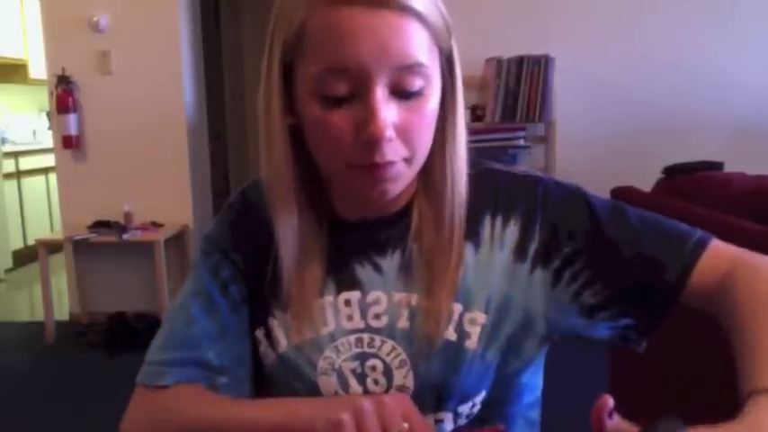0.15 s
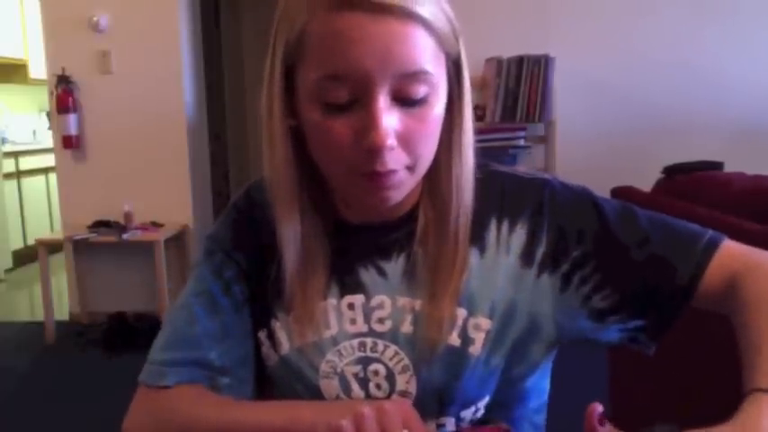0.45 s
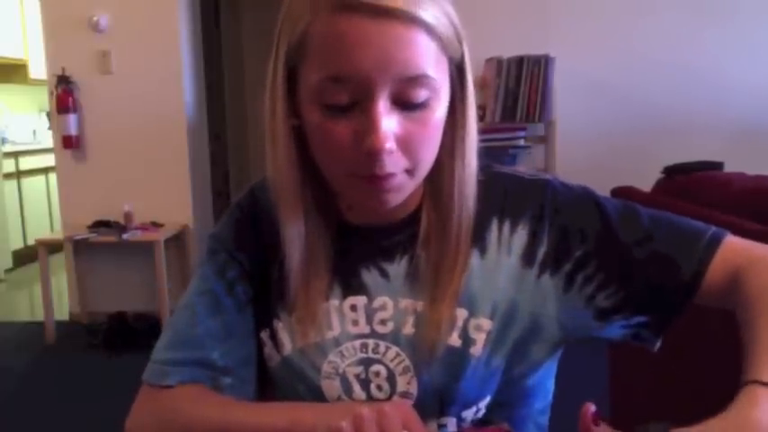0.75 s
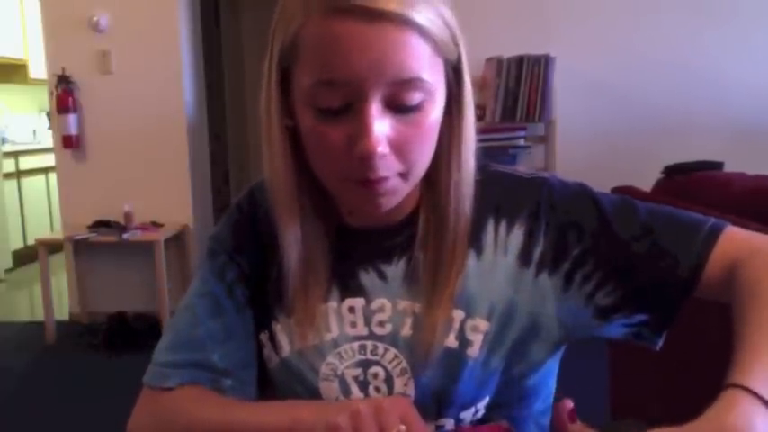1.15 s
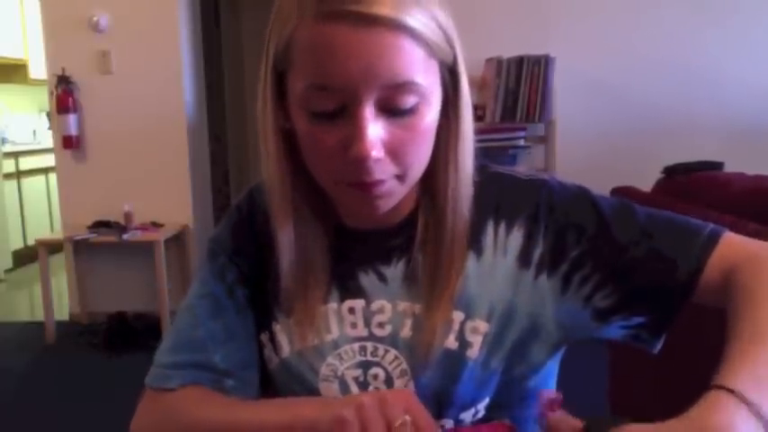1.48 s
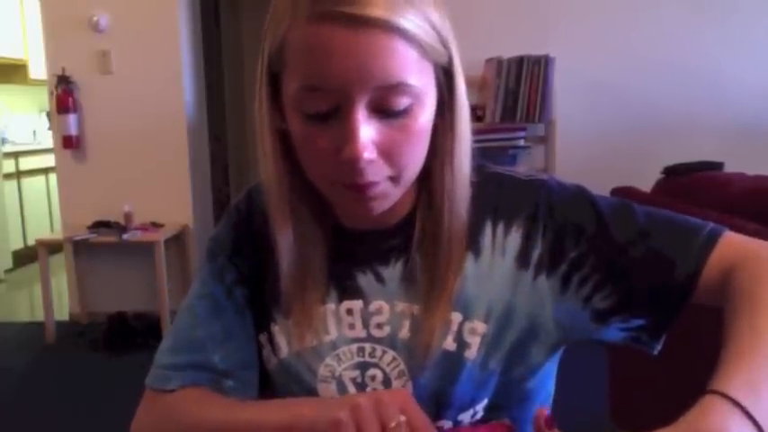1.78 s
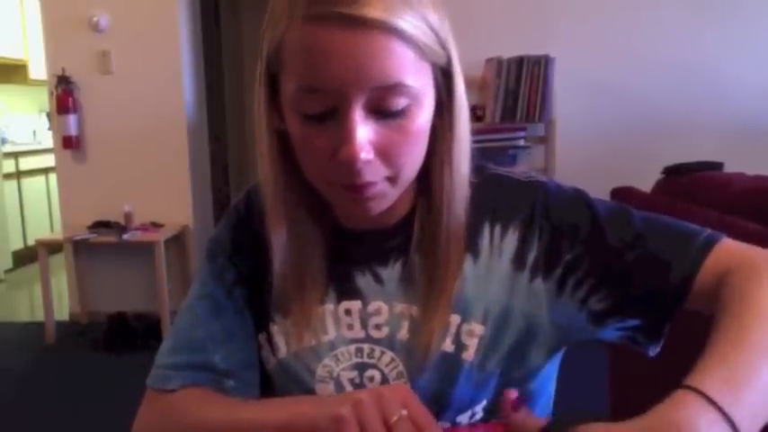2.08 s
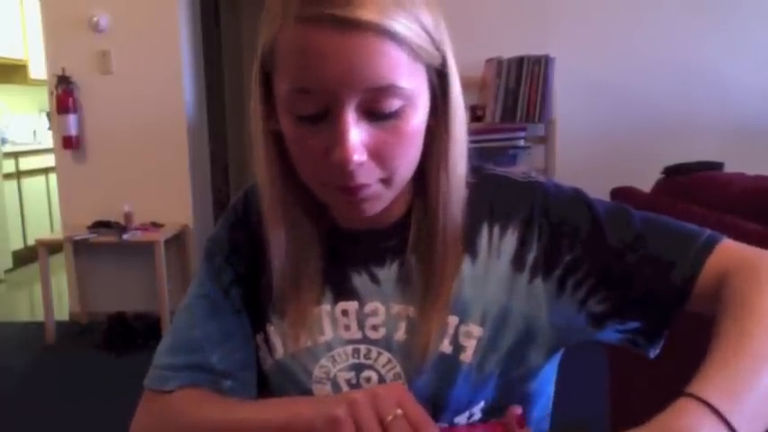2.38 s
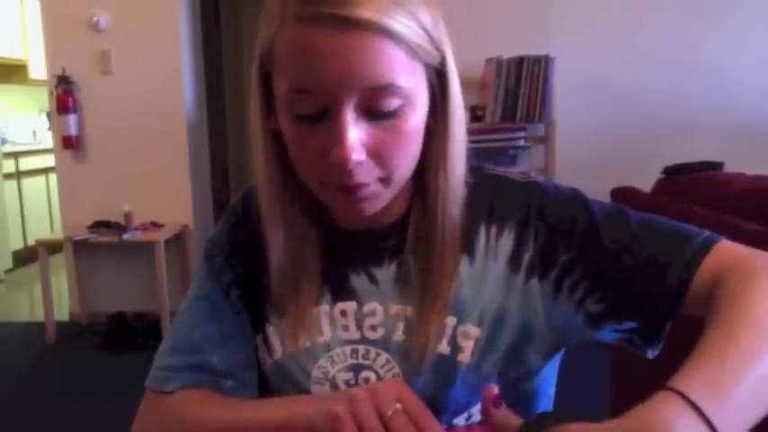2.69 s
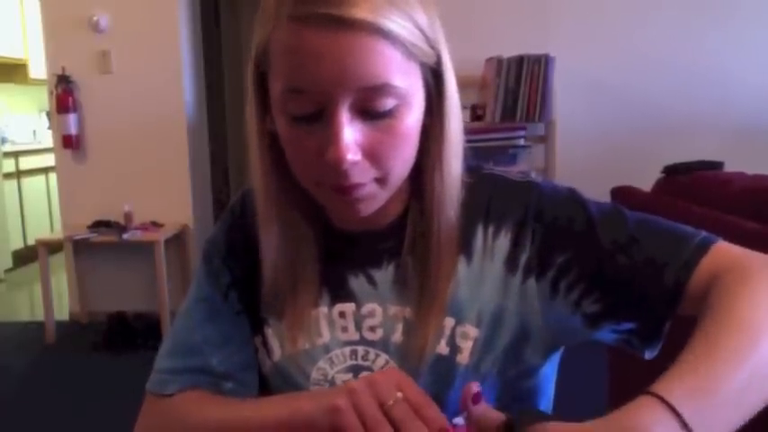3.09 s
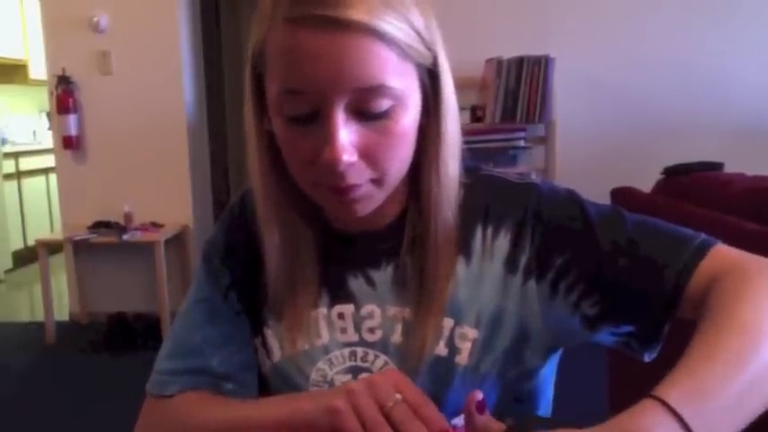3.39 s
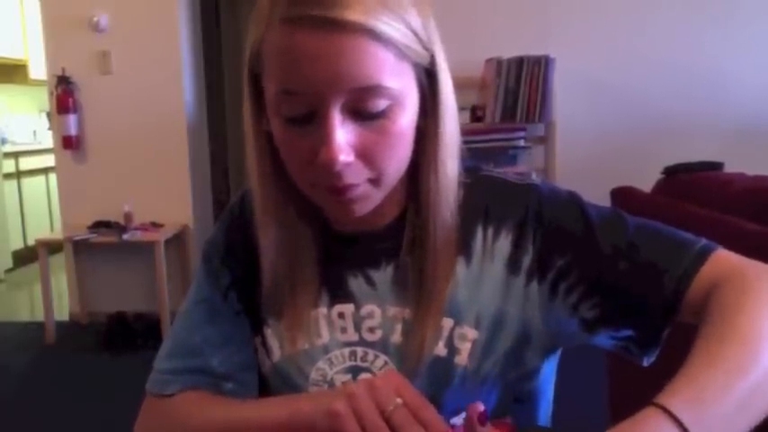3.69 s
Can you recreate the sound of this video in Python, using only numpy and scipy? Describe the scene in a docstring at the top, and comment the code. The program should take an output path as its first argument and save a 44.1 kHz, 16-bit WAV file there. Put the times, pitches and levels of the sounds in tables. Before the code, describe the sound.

Scissors cut thick cardboard in about seven crunchy snips, each with a faint table thump. The blades slide and tick between cuts, and the last is slower and heavier. Close microphone in a quiet room.

```python
"""Scissors cut thick cardboard at a table in a quiet living room.
Each snip is a run of short breaks: fibres crack, the sheet rings and the table thumps.
Between snips the blades open and slide forward in the slit; the last cut is slower and heavier.
The steel rasps and ticks, and the pivot squeaks faintly at the end.
A short echo and soft room noise lie behind it all."""
import sys
import numpy as np
from scipy import signal
from scipy.fft import rfft, irfft, next_fast_len
from scipy.io import wavfile

SR = 44100
rng = np.random.default_rng(int(sys.argv[2]) if len(sys.argv) > 2 else 0)


def unload_wav(signal):
    """Save mono or channel-first audio to the path in sys.argv[1] as 16-bit WAV at rate SR, clipped to [-1, 1]."""
    wavfile.write(
        sys.argv[1],
        SR,
        np.round(np.clip(np.atleast_2d(signal).T, -1, 1) * 32767).astype(np.int16),
    )


N = 169785

FLEX_HZ = 690  # the card beside the cut bends and rings near this pitch
SHEET_BAND_HZ, TABLE_BAND_HZ = (433, 1466), (102, 248)  # the part of a push that each takes up
# tone of breaking fibres: (frequency [Hz], level [dB])
CRACK_TONE = [(200, -27), (600, 5.5), (1000, 13), (1300, 6.5), (1720, 12), (2000, 8), (2400, 4.5),
              (3000, 2.5), (3700, 2.5), (5000, 1), (6500, -2.5), (8700, -8.5), (10000, -6), (11500, -12),
              (15500, -20.5)]
# notes the sheet rings at: (pitch [Hz], level [dB], time to fade by 60 dB [s])
SHEET_NOTES = [(387.6, -1, 0.11), (419, -2.5, 0.076), (472, 0, 0.087), (550.2, -5, 0.14), (617.1, -2, 0.15),
               (648, 1, 0.076), (712, 5, 0.053), (815.4, 6, 0.04), (862, 1.5, 0.034), (947, -2, 0.081),
               (1747, 0, 0.042), (2687, 8.5, 0.02)]
# notes the table rings at: (pitch [Hz], level [dB], time to fade by 60 dB [s])
TABLE_NOTES = [(146.4, 1, 0.079), (188.5, 1.5, 0.06), (242, 1.5, 0.09)]
# the card gives way: (time [s], length [s], crack [dB], treble lift [dB], sheet [dB], thump [dB])
BREAKS = [(0.373, 0.01, -28.5, 5, -32.5, -52.5), (0.3963, 0.0068, -29, 6.5, -31.5, -57),
          (0.415, 0.013, -39, 6, -66, -57), (0.494, 0.0052, -33, 8, -31.5, -62),
          (1.0268, 0.0068, -32.5, 4.5, -30.5, -52), (1.048, 0.01, -25.5, 8.5, -24.5, -50),
          (1.077, 0.0052, -35.5, 2.5, -26.5, -48.5), (1.1034, 0.0085, -24, -4, -18, -50),
          (1.1297, 0.01, -31.5, -2.5, -29, -49), (1.1527, 0.008, -28.5, -2, -27, -46.5),
          (1.1899, 0.0017, -28.5, 4.5, -24, -45.5), (1.584, 0.016, -27.5, 2, -25.5, -57),
          (1.601, 0.0054, -24, -3, -25.5, -42), (1.612, 0.0057, -40, -16, -26.5, -47),
          (1.6322, 0.0072, -22.5, 5, -27, -68), (1.6454, 0.0061, -28, -4, -26.5, -62),
          (1.6595, 0.007, -33.5, -11, -24, -43), (1.675, 0.0084, -22, 1, -24, -50),
          (1.8703, 0.0073, -29.5, -21, -38.5, -57), (2.1496, 0.0057, -21.5, -1.5, -22.5, -60),
          (2.1567, 0.02, -23, -1.5, -30, -39), (2.1772, 0.01, -21, 3, -24, -65),
          (2.185, 0.0055, -26.5, 1, -22.5, -37.5), (2.193, 0.016, -23, 1, -23, -48),
          (2.227, 0.009, -27, 0, -21, -42), (2.652, 0.017, -25, 6, -26, -37.5),
          (2.672, 0.0043, -24.5, 3.5, -29, -33), (2.6832, 0.0074, -19.5, -13, -23.5, -40),
          (2.693, 0.015, -32.5, 3, -29.5, -45), (2.7133, 0.003, -26.5, -9, -47, -43),
          (2.7226, 0.0027, -26.5, 4.5, -25, -62), (2.7314, 0.013, -30.5, -8, -32, -40),
          (2.757, 0.0049, -27, 5.5, -23.5, -34.5), (3.215, 0.01, -29.5, 2, -33, -43.5),
          (3.2694, 0.011, -24.5, 3, -24.5, -39), (3.2946, 0.0042, -31.5, 4.5, -37, -34),
          (3.3358, 0.0073, -29.5, -2, -28.5, -44), (3.3902, 0.0084, -23.5, -2, -25.5, -36.5),
          (3.425, 0.0067, -31, -3, -34, -47), (3.4355, 0.0061, -29, -2.5, -31.5, -36),
          (3.4588, 0.0055, -32.5, -5, -43.5, -40), (3.475, 0.0078, -29.5, -1, -32.5, -36),
          (3.559, 0.0076, -29.5, -5, -33, -41), (3.6966, 0.0031, -27.5, -4.5, -38, -32.5)]
def snips():
    """Each break is a burst of snapping fibres and one jolt; both shake the sheet and the table."""
    strain_s, attack_s, release_s, crush_s = .009, .003, .003, .012
    out, t = np.zeros(N), np.arange(BURST) / SR - strain_s
    for start, length, crack_db, treble_db, sheet_db, thump_db in BREAKS:
        strain = from_db(-15) * np.clip(1 + t / strain_s, 0, 1)  # a few fibres go early
        rise = np.maximum(np.clip(t / attack_s, 0, 1), strain)
        sag = from_db(-6 * np.clip(t / length, 0, 1))
        after = np.maximum(t - length, 0)
        force = rise * sag * np.exp(-after / release_s)
        crush = rise * from_db(-15) * np.exp(-after / crush_s)  # crushed fibres crunch on
        snaps = clicks(per_s=6500, spread_db=2, size=BURST)
        jolt = 1. * (np.arange(BURST) == np.argmax(force))  # the card suddenly lets go
        push = burst_one(force * snaps) + from_db(-8.5) * burst_one(jolt)
        grip = 1 + .015 * rng.standard_normal()  # the grip shifts the sheet's pitch
        flex_note = (FLEX_HZ * np.exp(.089 * rng.standard_normal()), 7, .014)
        low_fade_db = 3 * start  # low notes fade as the cut gets longer
        notes = [(grip * hz, db - low_fade_db * (hz < 550), fade_s) for hz, db, fade_s in SHEET_NOTES]
        sheet = from_db(sheet_db) * burst_one(ring(band(push, SHEET_BAND_HZ), notes + [flex_note]))
        thump = from_db(thump_db) * burst_one(ring(band(push, TABLE_BAND_HZ), TABLE_NOTES))
        tone = [(hz, db + np.interp(hz, [2250, 5700], [0, treble_db])) for hz, db in CRACK_TONE]
        fibres = colour(np.maximum(force, crush) * snaps, tone)
        crack = from_db(crack_db) * burst_one(near_echoes(fibres))
        add(out, start - strain_s, crack + sheet + thump)
    return out


# tone of steel rubbing on card: (frequency [Hz], level [dB])
RUB_TONE = [(150, -10.5), (500, 2), (950, 3), (1300, 5.5), (1600, 10.5), (1950, 5), (2400, 6.5),
            (3200, 4.5), (4500, 3.5), (5700, 1), (7500, 0.5), (8700, -6.5), (10300, -3), (11800, -11),
            (15500, -18)]
# faint notes of the rubbed slit: (pitch [Hz], level [dB], time to fade by 60 dB [s])
SLIT_NOTES = [(924, -2, .01), (1570, -4, 0.01), (4450, -5, 0.024)]
# the blades slide along the slit: (time [s], length [s], hiss [dB], sheet [dB])
SLIDES = [(0.719, 0.026, -34.5, -33), (0.738, 0.14, -30, -45.5), (0.87, 0.07, -42, -42.5),
          (1.302, 0.14, -34.5, -47), (1.536, 0.082, -40, -42), (1.698, 0.048, -50.5, -67),
          (1.844, 0.14, -33.5, -39), (1.963, 0.11, -56, -68), (2.075, 0.06, -45.5, -47),
          (2.24, 0.043, -47, -70), (2.372, 0.13, -36.5, -45), (2.879, 0.14, -39, -54),
          (3.122, 0.16, -51.5, -51), (3.803, 0.23, -46, -60)]
def slides():
    """Steel catches on card in countless tiny clicks: a hiss that makes the slit and sheet ring."""
    attack_s, release_s, swell_db = .016, .009, 8.5
    t = np.arange(N) / SR
    hiss_gain = treble_gain = sheet_gain = 0
    for start, length, hiss_db, sheet_db in SLIDES:
        along = np.clip((t - start) / length, 0, 1)
        rise = np.clip((t - start) / attack_s, 0, 1) ** 2
        fall = np.exp(-np.clip((t - start - length) / release_s, 0, 20))
        stroke = rise * from_db(-swell_db * (2 * along - 1) ** 2) * fall
        hiss_gain += from_db(hiss_db) * stroke
        treble_gain += from_db(hiss_db) * stroke ** 2.6  # the highest hiss needs speed
        sheet_gain += from_db(sheet_db) * stroke
    friction = from_db(1.8 * wander(per_s=160)) * clicks(per_s=9000, spread_db=2.4, size=N)
    sheet = rms_one(ring(band(friction, (FLEX_HZ, SHEET_BAND_HZ[1])), SHEET_NOTES))
    slit_speed = 1 + .08 * wander(per_s=16)  # the pitch strays as the gap changes
    slit = np.interp(np.cumsum(slit_speed) / SR % t[-1], t, ring(friction, SLIT_NOTES))
    rub = rms_one(colour(friction, RUB_TONE)) + from_db(-6) * rms_one(slit)
    # an echo across the moving gap shifts the tone
    gap_delay_s = .0011 + .0008 * np.tanh(wander(per_s=3.5))
    rub = rms_one(rub + .3 * np.interp(t - gap_delay_s, t, rub))
    dull = low_pass(rub, hz=6600)
    return hiss_gain * dull + treble_gain * (rub - dull) + sheet_gain * sheet


# tone of light steel contacts: (frequency [Hz], level [dB])
STEEL_TONE = [(900, 3.5), (2500, -14), (5500, 3.5), (7500, 1), (11000, -4), (15500, -16)]
# the blades brush each other as they are set: (time [s], length [s], level [dB])
BLADE_RUBS = [(0.327, 0.14, -52.5), (0.866, 0.14, -48), (2.054, .1, -48.5), (2.583, 0.061, -49.5)]
def blade_rasp():
    """Steel catches and slips on steel, making a thin rasp."""
    t = np.arange(N) / SR
    gain = sum(from_db(db) * np.sin(np.pi * np.clip((t - start) / length, 0, 1))
               for start, length, db in BLADE_RUBS)
    grit = from_db(4 * wander(per_s=220)) * clicks(per_s=9000, spread_db=2.4, size=N)
    return gain * rms_one(near_echoes(colour(grit, STEEL_TONE)))


CONTACT_S = .0024  # how fast a light touch dies away
# light ticks of the blades and the card's edge: (time [s], peak level [dB])
TICKS = [(.006, -31), (0.046, -38), (0.105, -38.5), (0.323, -29.5), (0.336, -31), (0.352, -42),
         (1.011, -28), (1.019, -22.5), (1.205, -38), (3.192, -31.5), (3.497, -27)]
def ticks():
    """Light touches make bright ticks; the card crackles faintly as it is lined up at the start."""
    out = np.zeros(N)
    fade = np.exp(-np.arange(PAD) / SR / CONTACT_S)
    for start, db in TICKS:
        tick = colour(rng.standard_normal(PAD) * fade, STEEL_TONE)
        add(out, start, from_db(db) * tick / np.abs(tick).max())
    rustles = signal.fftconvolve(np.abs(clicks(per_s=70, spread_db=4, size=N)), fade)[:N]
    crackle = rms_one(colour(rustles * rng.standard_normal(N), STEEL_TONE))
    lining_up = np.arange(N) / SR < .68
    return out + from_db(-65) * crackle * lining_up


# the pivot's note: (pitch [Hz], level [dB], time to fade by 60 dB [s])
PIVOT_NOTE = [(3190, 0, 0.052)]
# faint squeaks at the end: (time [s], level [dB])
SQUEAKS = [(3.768, -51.5), (3.836, -46)]
def squeaks():
    """A brief slip sets the pivot ringing."""
    out, t = np.zeros(N), np.arange(PAD) / SR
    for start, db in SQUEAKS:
        slip = rng.standard_normal(PAD) * np.exp(-t / CONTACT_S)
        add(out, start, from_db(db) * burst_one(ring(slip, PIVOT_NOTE)))
    return out


def near_echoes(x, fade_s=.0022, db=-8):
    """Add quick bounces off the card and hands, along new paths each time."""
    t = np.arange(PAD // 8) / SR
    paths = rng.standard_normal(len(t)) * np.exp(-t / fade_s)
    return x + from_db(db) * signal.fftconvolve(x, paths / np.linalg.norm(paths))[:len(x)]


# tone of the room's echo: (frequency [Hz], level [dB])
ECHO_TONE = [(150, -5), (400, -3), (750, 2), (2000, -1), (5000, -3), (15000, -9)]
def room_echo(x, low_fade_s=.26, treble_fade_s=.16, build_s=.005):
    """Sound bounces around a furnished room; the treble dies sooner."""
    t = np.arange(SR // 2) / SR
    noise = rng.standard_normal(len(t))
    low = low_pass(noise, hz=2500)
    tail = low * from_db(-60 * t / low_fade_s) + (noise - low) * from_db(-60 * t / treble_fade_s)
    tail *= np.minimum(t / build_s, 1)
    return signal.fftconvolve(x, colour(tail / np.linalg.norm(tail), ECHO_TONE))[:N]


# tone of the room's background noise: (frequency [Hz], level [dB])
NOISE_TONE = [(55, -12.5), (150, 5.5), (250, 0), (450, -8), (750, 0), (1200, -8.5), (1700, -4.5),
              (3000, -13.5), (10000, -29.5), (15500, -49)]
def room_noise():
    """A soft, steady, low hush."""
    return from_db(-56.5) * rms_one(colour(rng.standard_normal(N), NOISE_TONE))


BURST, PAD = 8192, 4096  # samples set aside for one break, and for a short tail


def from_db(db):
    """Turn decibels into a number to multiply by."""
    return 10 ** (np.asarray(db) / 20)


def rms_one(x):
    """Scale to an average strength (rms) of 1."""
    return x / np.sqrt(np.mean(x ** 2) + 1e-20)


def burst_one(x):
    """Scale to the energy of 10 ms at strength 1."""
    return x * np.sqrt(.01 * SR / (np.sum(x ** 2) + 1e-20))


def add(out, start, x):
    """Mix x into out, beginning at start seconds."""
    i = int(np.clip(start * SR, 0, N))
    out[i:i + len(x)] += x[:N - i]


def clicks(per_s, spread_db, size):
    """Random clicks of uneven strength."""
    strength = from_db(spread_db * np.minimum(rng.exponential(1, size), 4))
    return strength * rng.choice([-1, 1], size) * (rng.random(size) < per_s / SR)


def wander(per_s):
    """Drift to a new random value per_s times a second."""
    return np.interp(np.arange(N) / SR * per_s, np.arange(PAD), rng.standard_normal(PAD))


def ring(x, notes):
    """Let x shake an object that rings at these fading notes."""
    out = 0
    for hz, db, fade_s in notes:
        decay, angle = from_db(-60 / (fade_s * SR)), 2 * np.pi * hz / SR
        feedback = [1, -2 * decay * np.cos(angle), decay * decay]
        out += from_db(db) * signal.lfilter([1, 0, -1], feedback, x + 1e-18)
    return out


def colour(x, tone):
    """Shape the lows and highs of x to follow a tone table."""
    size = 2 * next_fast_len((len(x) + PAD) // 2)
    hz = np.maximum(np.arange(size // 2 + 1) * SR / size, 1)
    tone_hz, tone_db = np.transpose(tone)
    bass_cut_db = 20 * np.log10(np.minimum(hz / tone_hz[0], 1))
    db = np.interp(np.log(hz), np.log(tone_hz), tone_db) + bass_cut_db
    # build the filter so that it never rings ahead of a click
    cepstrum = irfft(np.log(from_db(db)))
    cepstrum[1:] *= 2
    response = np.exp(rfft(cepstrum[:size // 2], size))
    return irfft(rfft(x, size) * response)[:len(x)]


def band(x, edges_hz):
    """Keep the sound between two frequencies."""
    return signal.sosfilt(signal.butter(2, edges_hz, "band", fs=SR, output="sos"), x)


def low_pass(x, hz):
    """Soften the sound above hz."""
    return signal.sosfilt(signal.butter(1, hz, fs=SR, output="sos"), x)


def scene():
    """Scissors and card close by, in a quiet room."""
    cutting = snips() + slides() + blade_rasp() + near_echoes(ticks()) + squeaks()
    return (cutting + room_noise() + from_db(-13) * room_echo(cutting))[None]


def record(dry):
    """Cut off the very highest treble steeply."""
    cutoff_hz = 15950
    return signal.sosfilt(signal.ellip(10, .2, 80, cutoff_hz, fs=SR, output="sos"), dry)


dry = scene()
out = record(dry)
unload_wav(out)
```